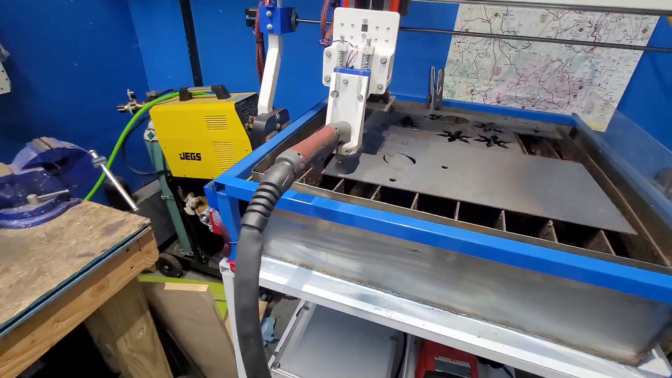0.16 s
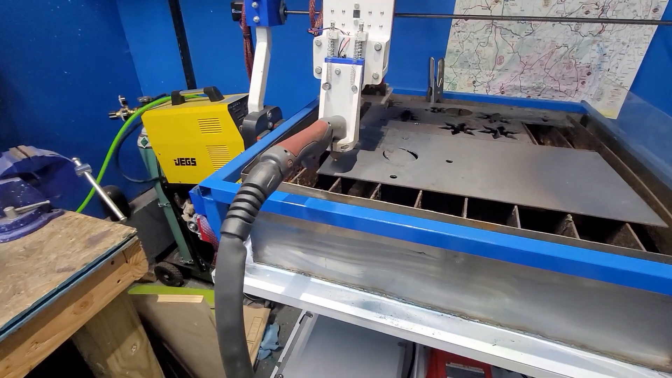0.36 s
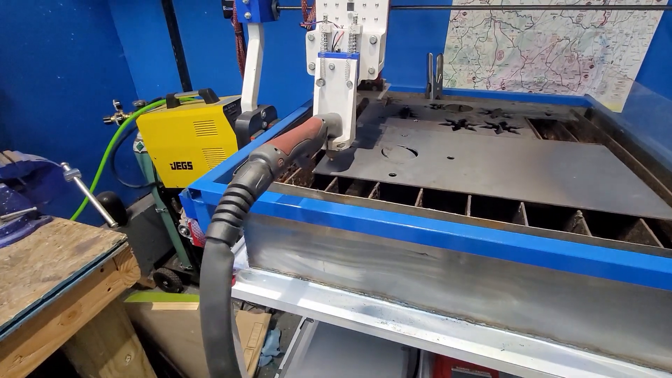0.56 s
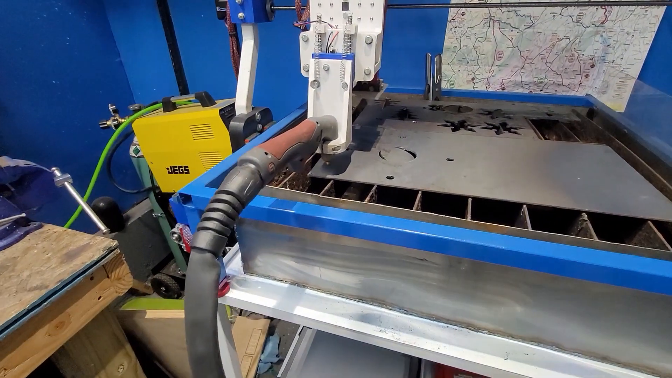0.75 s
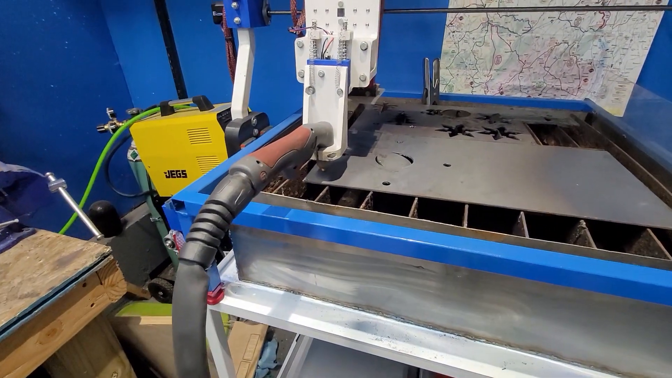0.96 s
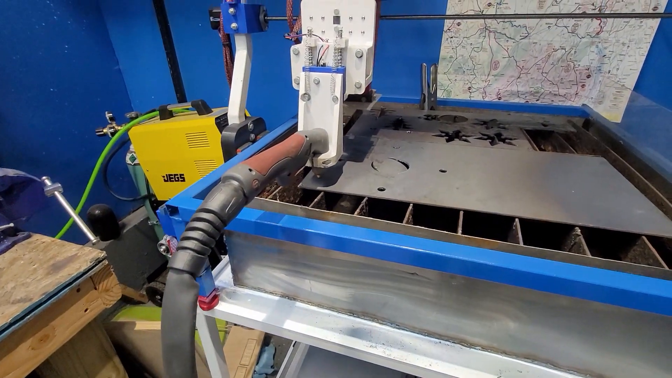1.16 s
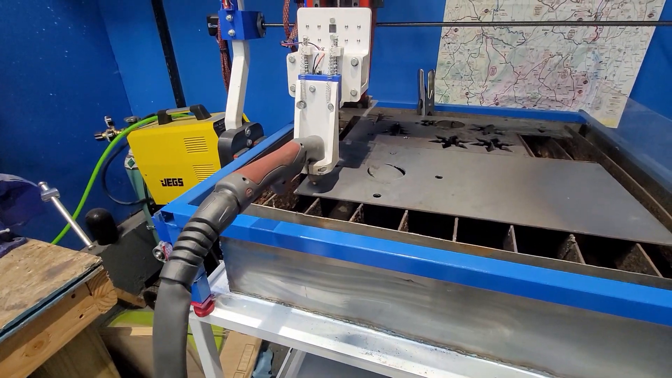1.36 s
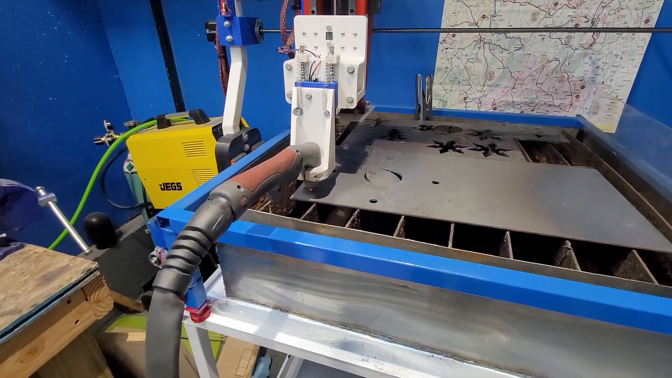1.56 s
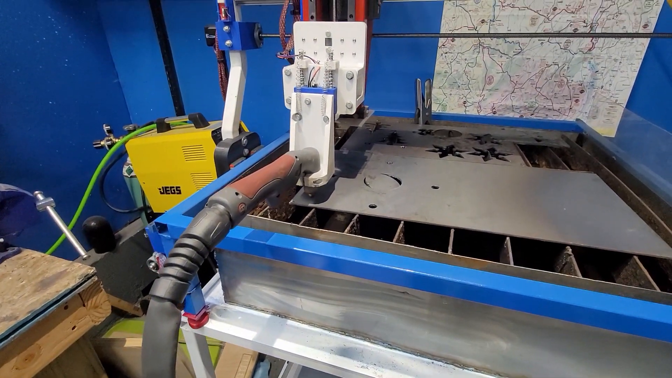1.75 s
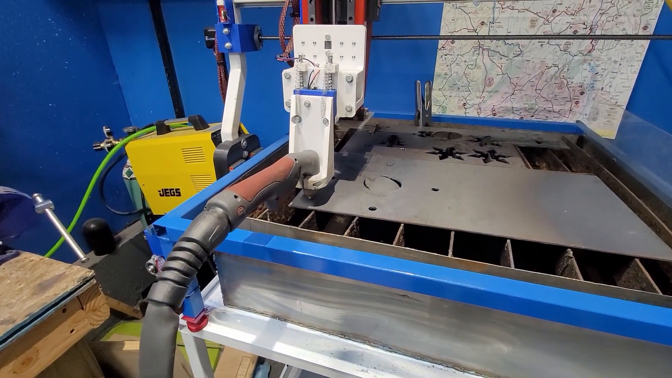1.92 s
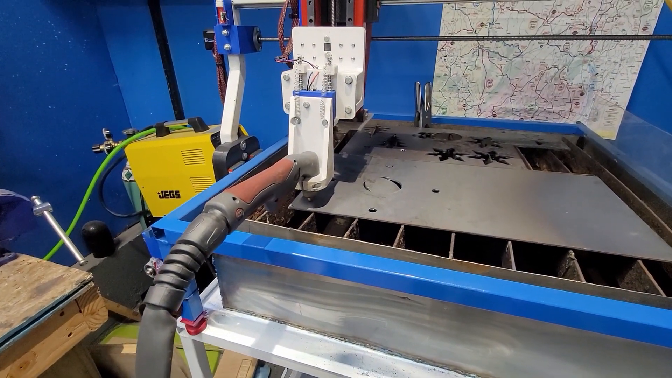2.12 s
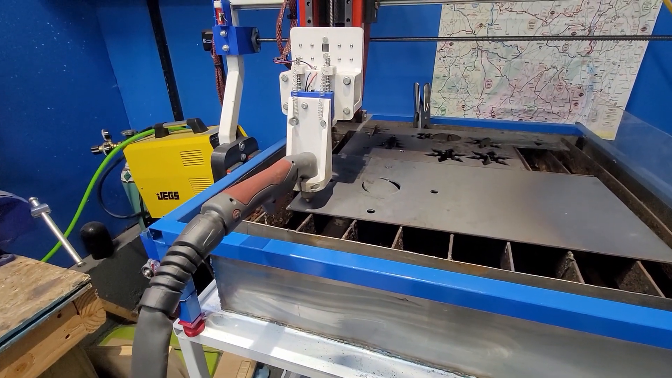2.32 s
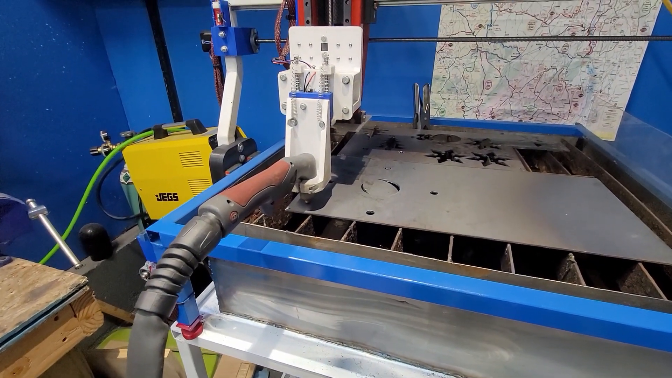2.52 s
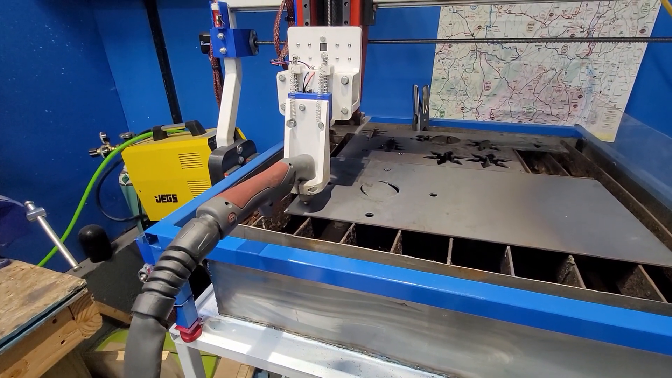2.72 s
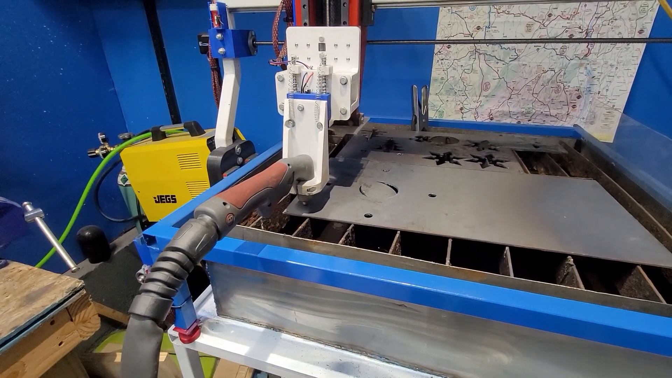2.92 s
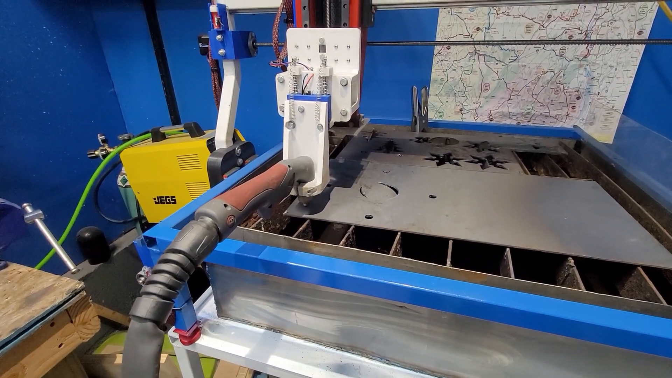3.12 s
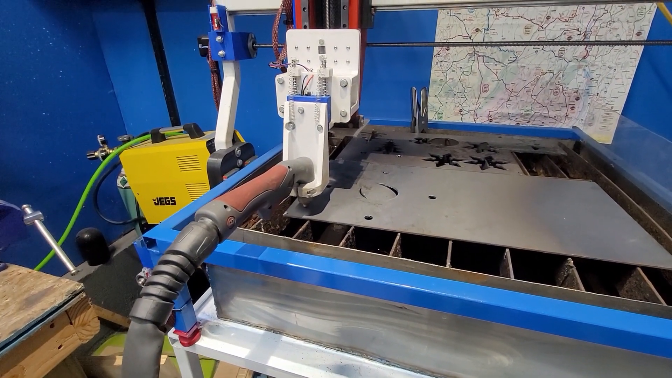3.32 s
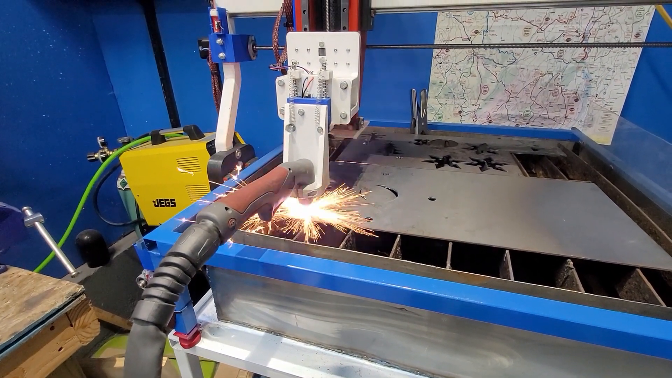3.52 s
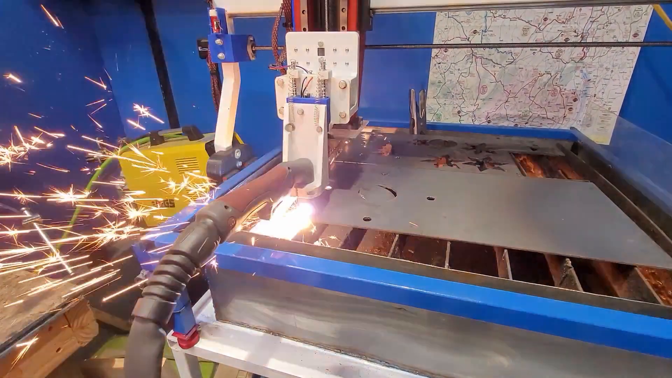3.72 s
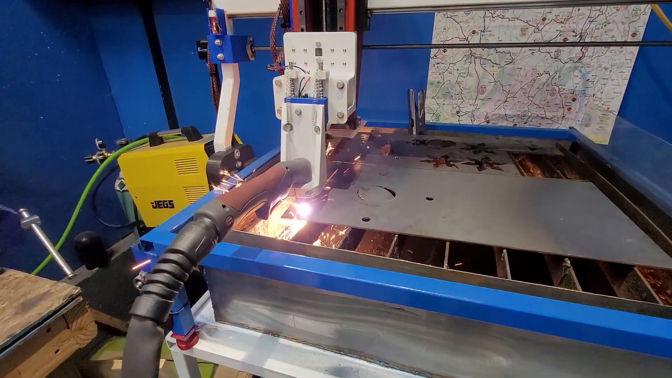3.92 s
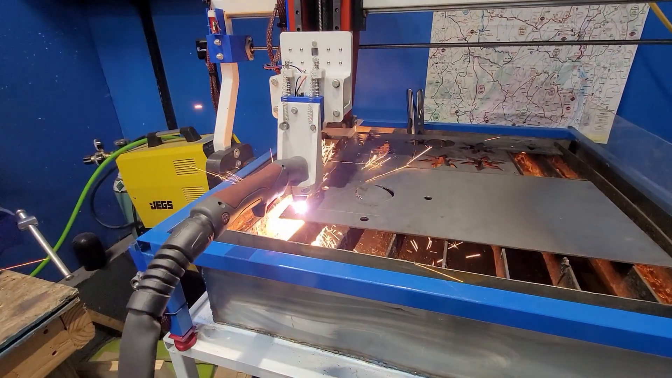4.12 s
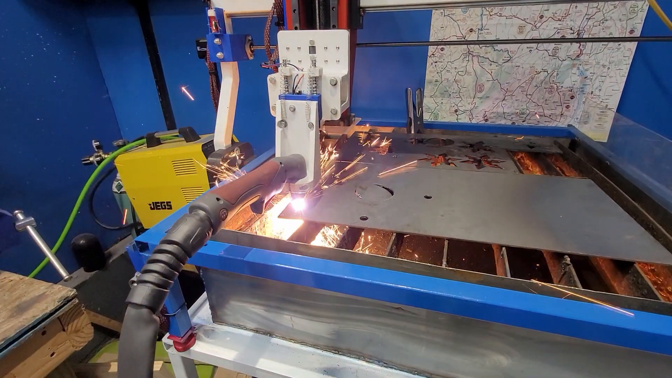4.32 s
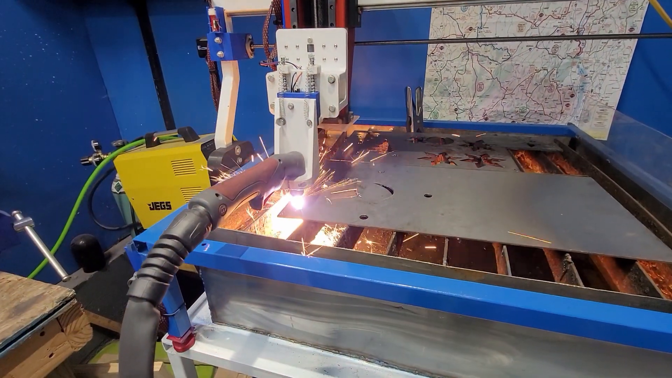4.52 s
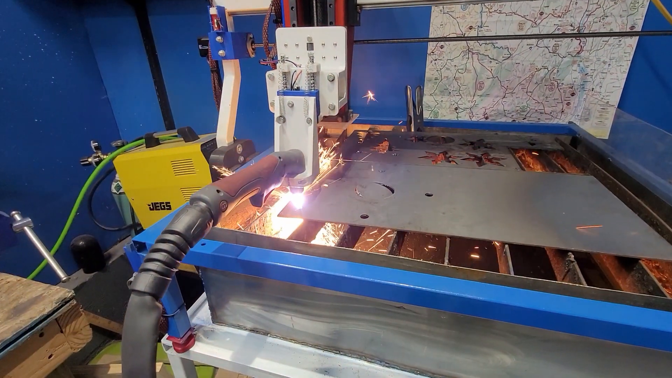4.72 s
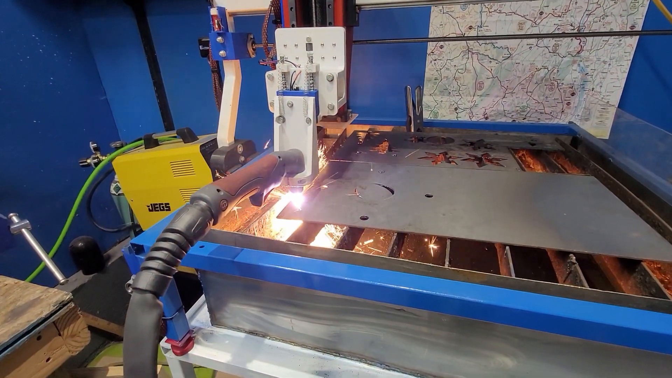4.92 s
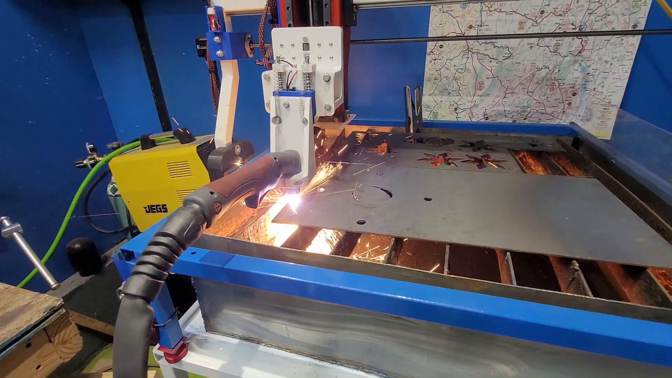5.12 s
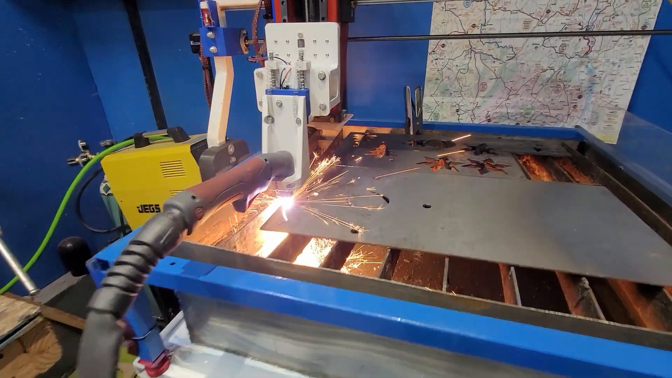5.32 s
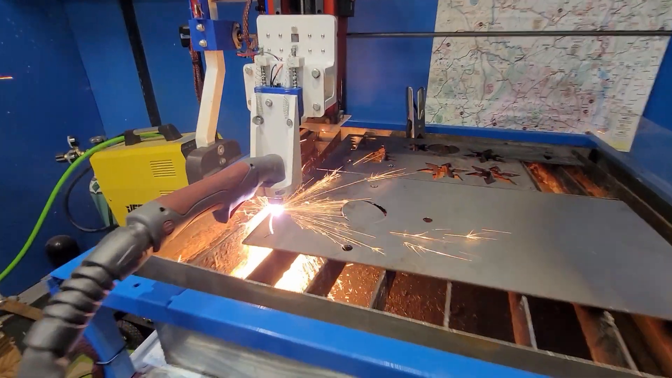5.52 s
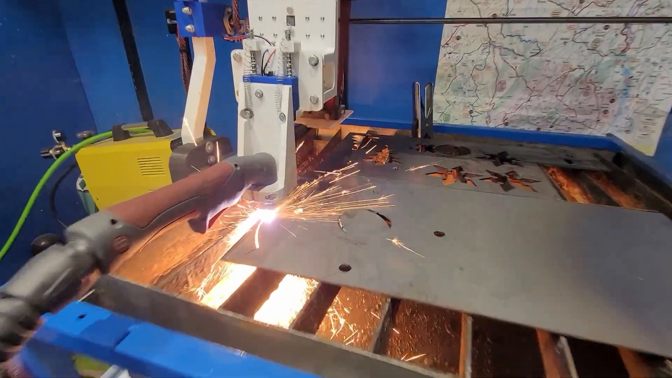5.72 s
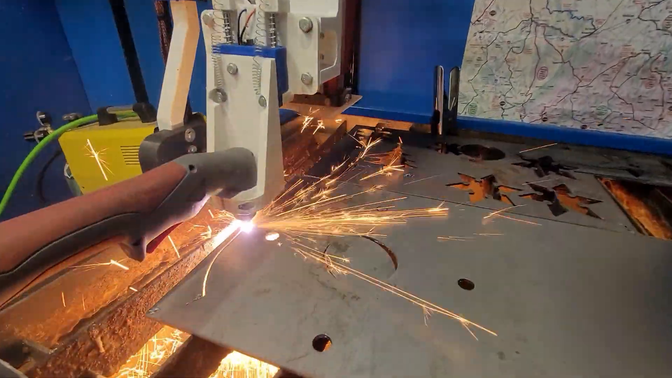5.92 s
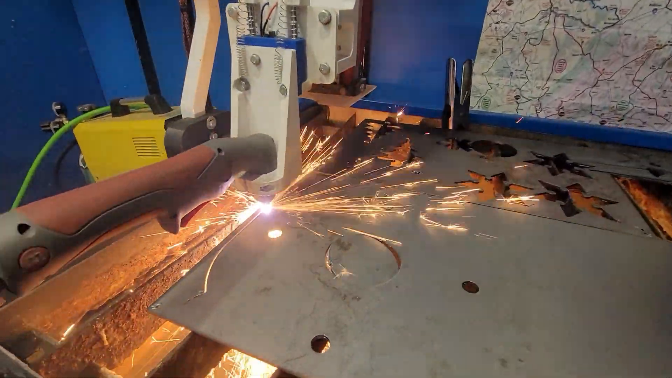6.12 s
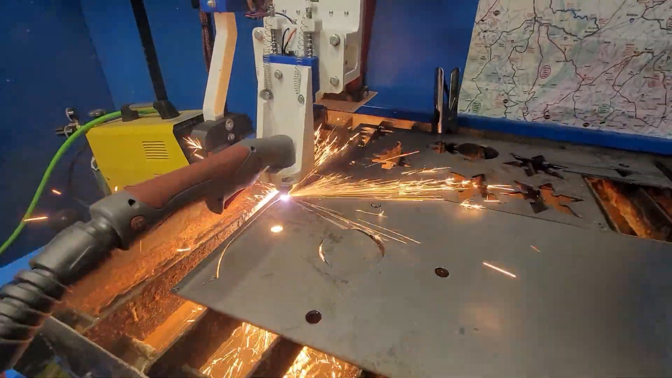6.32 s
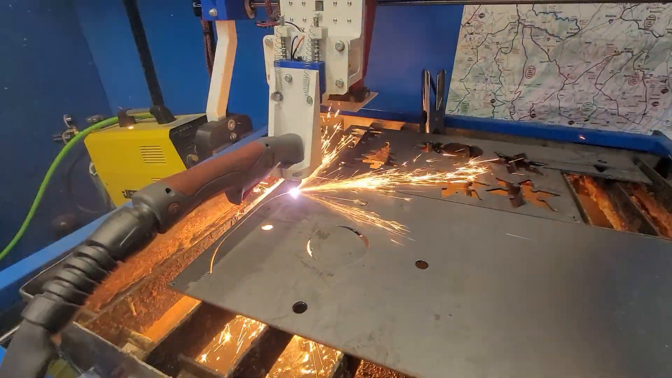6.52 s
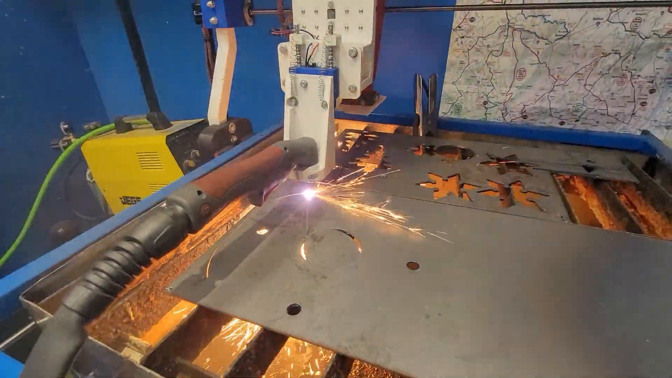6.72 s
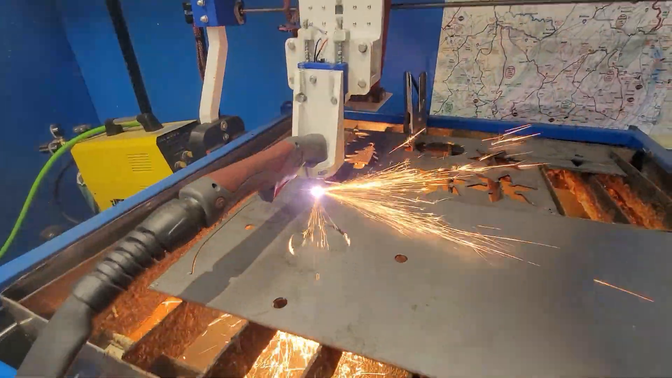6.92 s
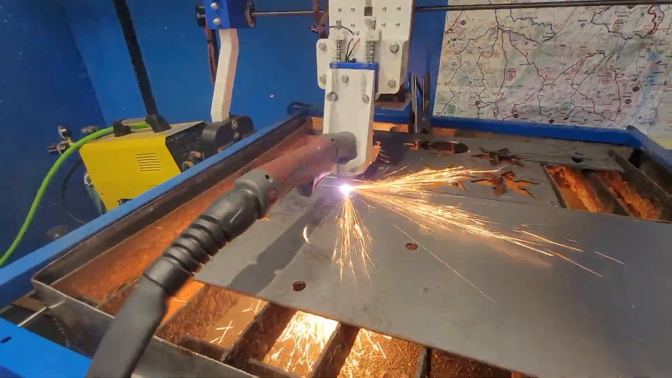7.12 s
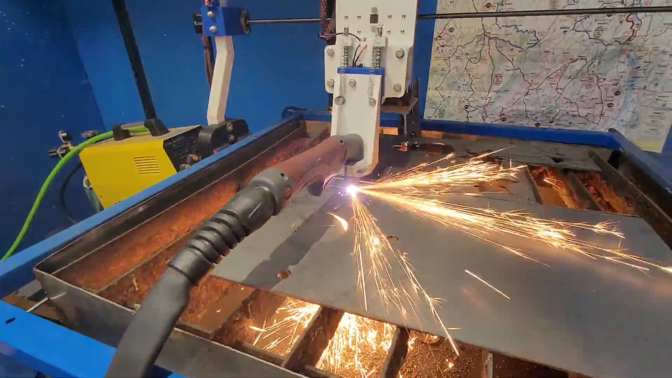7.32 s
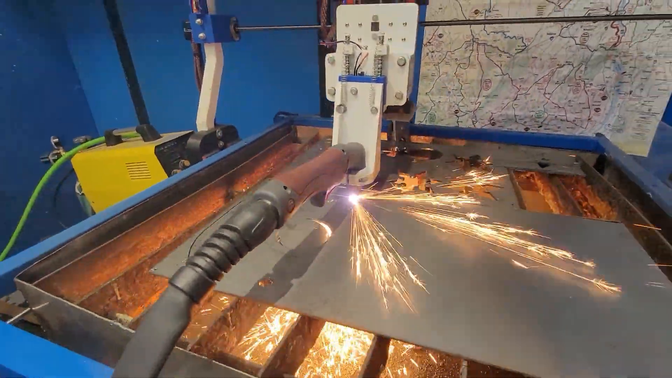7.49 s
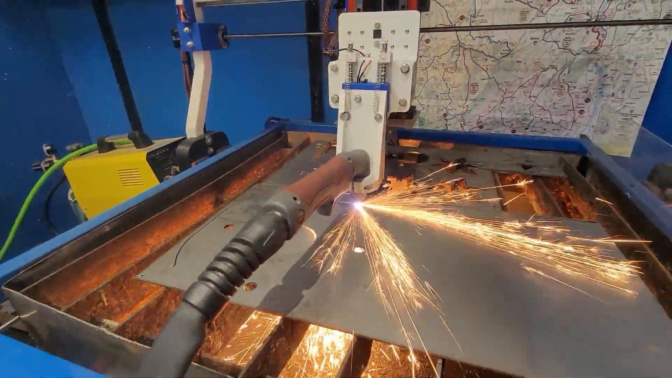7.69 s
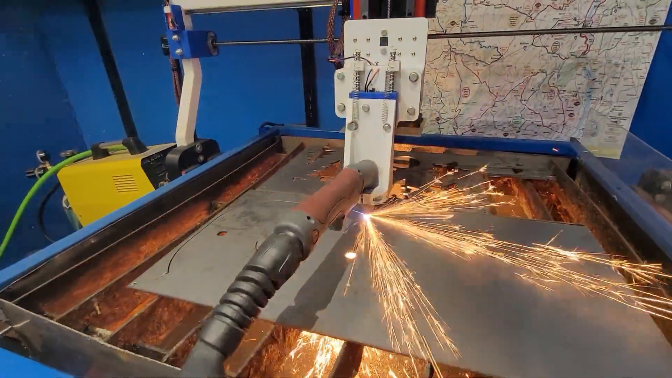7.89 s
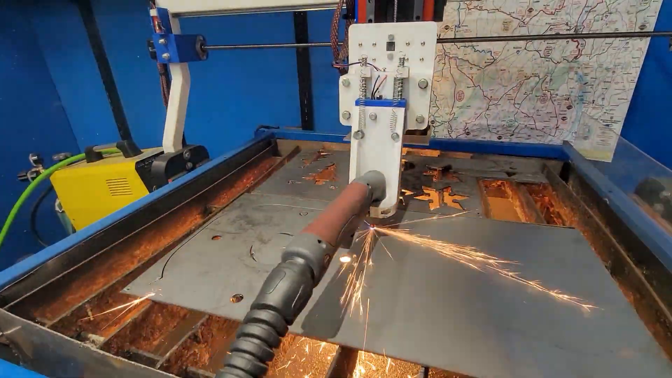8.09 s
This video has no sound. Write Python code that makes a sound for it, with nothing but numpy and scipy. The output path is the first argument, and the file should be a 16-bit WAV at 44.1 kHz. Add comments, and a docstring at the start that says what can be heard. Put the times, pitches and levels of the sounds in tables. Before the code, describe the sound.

In a small, fairly dry workshop, a fan hums low while feet shuffle, a hand bumps the microphone and thin squeaks chirp. After three and a half seconds a springy metallic valve thump opens the air, a bright blast pierces steel plate, and a close cutting torch hisses and roars to the end, its ringing colour shifting as the hand-held stereo microphone moves.

```python
"""A fan hums in a small workshop while something scuffs and ticks and a few squeaks sound: shaped noise, bursts
and gliding sines. At 3.45 s the air valve of a plasma torch on a cutting table thumps: a springy blow rings its
housing. The arc pierces the plate with a bright blast, then the jet hisses and roars through the kerf: banded
noise through moving resonances, dipping at three support slats. Gusts from the cut strike the left port of a
hand-held microphone."""
import sys
import numpy as np
from scipy import signal
from scipy.fft import rfft, irfft, next_fast_len
from scipy.io import wavfile

SR = 44100
rng = np.random.default_rng(int(sys.argv[2]) if len(sys.argv) > 2 else 0)


def output_pcm(signal):
    """Save a mono or channel-first signal as 16-bit PCM at the path in sys.argv[1].

    Samples are clipped to [-1, 1] before scaling.
    """
    pcm = np.clip(np.atleast_2d(signal).T, -1, 1) * 32767
    wavfile.write(sys.argv[1], SR, np.round(pcm).astype(np.int16))


N = 359415

AIR_ON_S, VALVE_S = 3.452, 3.4572
PORT_LAG_S = 0.00012   # the direct sound reaches the right port later
ROOM_T60_S, ROOM_DB = 0.13, 5.5   # decay of the room's tail, and its level over the direct sound
# left-right likeness of the torch's noise before the room: frequency_hz, likeness (0 to 1)
TORCH_LIKENESS = [(60, 0.64), (240, 0.43), (950, 0.63), (3800, 0.69), (15000, 0.21)]


def torch():
    """The air opens, the arc pierces and cuts: hiss, roar and low sound share a ring that shifts and swells."""
    # course of the torch, jet and roar ahead of a 3 dB lift: time_s, jet_db, plate_over_jet_db, roar_db
    torch_course = [(3.452, -21, -26, -29), (3.457, -22, -18, -36), (3.463, -30, -15, -42),
                    (3.476, -29, -14, -45), (3.499, -23, -16, -42), (3.505, -13.5, -15.5, -25.5),
                    (3.57, -13.5, -14.5, -31), (3.63, -13.5, -25.5, -31.5), (3.67, -15.5, -16, -33.5),
                    (3.722, -16, -22, -31.5), (3.74, -23, -16, -34), (3.8, -25.5, -15, -37),
                    (3.925, -21.5, -15.5, -33), (4.02, -27.5, -9.5, -36), (4.12, -26, -12, -34),
                    (4.72, -18.5, -16, -29), (5.15, -19, -13, -28.5), (5.55, -18, -13.5, -28),
                    (5.75, -19, -9, -28.5), (5.81, -22, -9.5, -32), (6.2, -22.5, -10, -30.5),
                    (6.55, -22.5, -10.5, -30.5), (6.76, -21.5, -9.5, -27), (6.98, -22.5, -11.5, -28.5),
                    (7.12, -22.5, -9, -28), (7.4, -21.5, -8, -29), (7.6, -23, -6, -27.5),
                    (7.74, -22, -9.5, -26), (7.96, -23.5, -6, -28), (8.15, -23, -10.5, -28.5)]
    # support slats under the plate: time_s, half_width_s, roar_dip_db
    slat_crossings = [(6.817, 0.027, -8.5), (7.283, 0.024, -9), (7.774, 0.021, -9.5)]
    # left minus right level as the microphone moves: time_s, treble_pan_db, roar_pan_db
    side_course = [(3.44, 2, -2), (3.91, 2.5, -0.5), (4.87, 3, 0), (6.08, 3.5, -3), (6.68, 4, -3),
                   (7.72, 1.5, -2), (8.15, 3, -1.5)]
    # shifting ring in the sound of the cut: time_s, centre_hz, gain_db
    gap_course = [(3.45, 3120, -9), (4.1, 3100, -4), (4.8, 2860, -8), (5.5, 3580, -9.5), (5.7, 3800, -5),
                  (5.95, 3240, -5.5), (6.2, 3370, -6), (6.3, 3050, -2), (6.45, 3330, 0), (6.56, 3400, -1),
                  (6.7, 3730, -6), (7.0, 3160, -18), (7.15, 2930, -6), (7.25, 3630, -5), (7.52, 3350, -20),
                  (7.65, 3030, -6), (7.8, 3950, -0.5), (7.92, 3670, -1.5), (8.15, 3200, -10)]
    slat_jet_share = 0.17   # share of the roar's dip that the jet takes
    turn_s, turn_length_s = 5.72, 0.19   # the torch turns from the plate's edge inward
    gap_width_hz, opening_s = 800, 0.0015

    jet_db, plate_db, roar_db = in_time(torch_course)
    for s, half_width, dip_db in slat_crossings:   # the slat chokes the outflow for a moment
        choke_db = dip_db * np.exp(-((seconds() - s) / half_width) ** 4)
        jet_db = jet_db + slat_jet_share * choke_db
        roar_db = roar_db + choke_db
    turned = np.clip((seconds() - turn_s) / turn_length_s, 0, 1)
    age = np.maximum(seconds() - AIR_ON_S, 0)
    start = round(AIR_ON_S * SR)
    spaces = [room(next_fast_len(N - start)).astype(np.complex64) for place in range(5)]
    sputter = drift(40)   # molten metal leaves the kerf in spurts

    treble_pan_db, roar_pan_db = in_time(side_course)
    hiss = jet_hiss(jet_db, plate_db, treble_pan_db, sputter, spaces, start)
    roar = kerf_roar(roar_db, turned, age, sputter, spaces, start)
    low = under_table(roar_db, turned, age, start)
    cut = hiss + panned(roar + low, roar_pan_db)
    gap_hz, gap_db = in_time(gap_course)
    ringing = from_db(gap_db) * moving_resonance(cut, gap_hz, gap_width_hz)
    return np.clip(age / opening_s, 0, 1) * (cut + ringing)


def jet_hiss(jet_db, plate_db, treble_pan_db, sputter, spaces, start):
    """Nozzle turbulence: the jet above 4200 Hz and, below it, the duller hiss off the plate."""
    # nozzle spectrum: frequency_hz, relative_level_db_per_hz
    nozzle_spectrum = [(1290, -28), (2200, -12.5), (2430, -11), (3490, -7.5), (4550, -5.5), (6220, -0.5),
                       (7580, -1), (8580, 1.5), (10600, -1), (12600, 2), (14300, -4.5), (15200, -5),
                       (15800, -3)]
    top_pan_db = -3.5   # the top sits to the right
    blast_top_db, blast_ends_s, blast_fade_s = 7, 3.66, 0.08   # brighter top until the arc breaks through

    noise = air(nozzle_spectrum, [], TORCH_LIKENESS, shared_db=0.0, own_db=1.0, rate=22, space=spaces, start=start)
    plate, jet = split(noise, 4200)
    jet, top = split(rms_one(jet), 10500)
    blast_db = blast_top_db * np.clip((blast_ends_s - seconds()) / blast_fade_s + 1, 0, 1)
    bright = panned(jet + from_db(plate_db) * rms_one(plate), treble_pan_db)
    bright += panned(top * from_db(blast_db), np.full(N, top_pan_db))
    return np.sqrt(2) * from_db(jet_db + 0.29 * sputter) * bright


def kerf_roar(roar_db, turned, age, sputter, spaces, start):
    """Sputtering outflow in the kerf: noise that changes colour at the turn, with rings growing as the cut deepens."""
    # roar along the plate's edge: frequency_hz, relative_level_db_per_hz
    edge_spectrum = [(290, -29), (500, -8.5), (578, -9.5), (828, -8.5), (977, -3.5), (1220, -5.5),
                     (1440, -0.5), (1570, -6.5), (1720, -5.5), (2800, -8), (3640, -22), (6160, -120)]
    # roar after the turn inward: frequency_hz, relative_level_db_per_hz
    inner_spectrum = [(290, -58), (500, -26), (621, 1.5), (754, -2), (943, 3), (1050, -7), (1150, 1.5),
                      (1640, -0.5), (2140, -2.5), (2800, -10), (3640, -3.5), (6160, -120)]
    # plate resonances: centre_hz, width_hz, gain_db
    plate_modes = [(920, 120, 1.5), (1156, 7.8, 6), (1440, 84, -3), (1755, 77, -0.5)]
    # resonance of the gap under the nozzle, swelling as a slat comes near: time_s, centre_hz, gain_db
    throat_course = [(4.0, 1430, 8.5), (4.4, 1410, 4), (4.85, 1560, 1.5), (5.3, 1570, 2), (5.7, 1840, 4.5),
                     (6.0, 1570, 2.5), (6.3, 1630, 1.5), (6.5, 1520, 8.5), (6.77, 1620, 5.5),
                     (6.95, 1280, 2.5), (7.2, 1390, 3.5), (7.35, 1480, 6), (7.5, 1570, 6.5),
                     (7.74, 1530, 1.5), (7.85, 1550, 0.5), (8.02, 1770, 5), (8.15, 1600, -4)]
    # narrow rings that wander in the roar: centre_hz, gain_db
    strand_rings = [(1150, -4), (1900, -8)]
    # ridges gliding as the pocket between plate and slats changes: time_s, low_hz, low_db, high_hz, high_db
    ridge_course = [(4.0, 1380, -10, 1700, -18), (4.6, 1410, -9, 1750, 2), (5.1, 1470, 0, 1670, -7),
                    (5.7, 1420, -4, 1820, -16), (5.9, 1406, 1, 1830, -3), (6.35, 1350, -1, 1900, -4),
                    (6.48, 1470, 2, 1970, -7), (6.64, 1510, 4, 2000, -3), (6.78, 1600, -1, 1810, 2),
                    (6.9, 1400, -3, 1640, -10), (7.1, 1330, -3, 1690, 1), (7.27, 1400, -14, 1720, -3),
                    (7.45, 1480, 4, 1660, -4), (7.6, 1420, -5, 1640, 1), (7.74, 1410, 10, 1920, 0),
                    (7.85, 1430, -10, 1570, 2), (8.03, 1500, -4, 1740, 6), (8.15, 1550, 1, 1780, 1)]
    throat_width_hz, strand_width_hz, ridge_width_hz = 690, 44, 67
    strand_wander = 0.039   # share of the pitch, reached after the turn
    edge_wander_share = 0.45   # the wander is smaller along the edge
    ridge_flutter_db = 2.5
    deep_s = 1.35   # the rings grow until the kerf is cut this long

    edge, inner = [air(colour, plate_modes, TORCH_LIKENESS, shared_db=0.0, own_db=1.5, rate=12.5,
                       space=spaces, start=start) for colour in (edge_spectrum, inner_spectrum)]
    kerf = np.sqrt(1 - turned) * edge + np.sqrt(turned) * inner
    deep = np.clip(age / deep_s, 0, 1)

    throat_hz, throat_db = in_time(throat_course)
    throat_gain = from_db(throat_db + (0.6 + 0.34 * turned) * sputter)
    kerf = kerf + deep * throat_gain * moving_resonance(kerf, throat_hz, throat_width_hz)

    wander = strand_wander * (edge_wander_share + (1 - edge_wander_share) * turned)
    strands = 0
    for hz, db in strand_rings:
        strand_hz = hz * (1 + wander * drift(3.3))
        strands = strands + from_db(db + 0.76 * drift(4.3)) * moving_resonance(kerf, strand_hz, strand_width_hz)
    kerf = kerf + deep * strands

    low_hz, low_db, high_hz, high_db = in_time(ridge_course)
    ridges = 0
    for hz, db in ((low_hz, low_db), (high_hz, high_db)):
        flutter_db = ridge_flutter_db * drift(25)
        ridges = ridges + from_db(db + flutter_db) * moving_resonance(kerf, hz, ridge_width_hz)
    kerf = kerf + deep * ridges
    return np.sqrt(2) * from_db(roar_db + (0.4 + 0.45 * turned) * sputter) * rms_one(kerf)


def under_table(roar_db, turned, age, start):
    """Rumble and drone under the table follow the roar; the first rush of air booms and the table drive hums."""
    # spectrum under the table: frequency_hz, relative_level_db_per_hz
    rumble_spectrum = [(12, -49), (20, -84), (75, -9.5), (197, -4), (253, -3.5), (307, -1), (349, 1.5),
                       (406, 0), (560, -3.5), (730, -26), (1230, -120)]
    # table drive along the first edge: pitch_hz, level_db, start_s, end_s
    drive_hum = (157, -52.5, 4.5, 5.75)
    boom_db, boom_rise_s, boom_t60_s = -29, 0.03, 0.3

    over_db = roar_db + 30   # roar above a reference of -30 dB
    rumble_db = -46.5 + 0.97 * over_db - 0.14 * turned
    drone_db = -47 + 2 * over_db - 10 * turned
    boom_fall_db = 60 * np.maximum(age - boom_rise_s, 0) / boom_t60_s
    boom = np.clip(age / boom_rise_s, 0, 1) ** 2 * from_db(boom_db - boom_fall_db)
    noise = air(rumble_spectrum, [], TORCH_LIKENESS, shared_db=1.1, own_db=4.0, rate=8.6, start=start)
    rumble, drone = split(noise, 274)
    low = from_db(rumble_db) * rms_one(rumble) + (from_db(drone_db) + boom) * rms_one(drone)
    return low + tone(*drive_hum, waver=0.83, rate=3.8)


def valve():
    """The plunger lands with a springy blow of a few cycles that sets the modes of the housing ringing."""
    # modes of the valve housing: pitch_hz, gain_db, t60_s
    housing_modes = [(291, 3, .2), (321, 3, .17), (420, -5.5, 0.23), (480, -1, 0.15), (654, -1, 0.18),
                     (830, 7, 0.045), (900, 15, .05), (190, -2, .12), (110, -1, 0.16), (993, 1, .12),
                     (1240, 5, .12), (1470, -1, 0.088)]
    blow_db, rattle_db, rattle_t60_s = -20, -22, 0.32

    out, blow, at = np.zeros((2, N)), np.zeros(SR // 2), round(VALVE_S * SR)
    blow[0] = from_db(blow_db)
    springy = 0.027 * ring(blow, 361, 0.063)
    springy += 0.11 * np.roll(blow, round(0.00187 * SR))   # metal meets metal
    springy += 0.11 * np.roll(blow, round(0.019 * SR))   # and rebounds
    boom = split(sum(from_db(db) * ring(springy, hz, t60) for hz, db, t60 in housing_modes), 103)[1]
    echoed = irfft(rfft(boom) * room(len(blow)), len(blow))
    # loose parts rattle and the floor thuds
    dying = from_db(rattle_db - 60 * np.arange(len(blow)) / SR / rattle_t60_s)
    rattle = band_noise(60, 1100, len(blow))
    out[:, at:at + len(blow)] = dying * rms_one(rattle) + boom + 0.25 * echoed
    return out


def gusts():
    """Sudden pressure steps, rounded, which the microphone's bass cut turns into a spike and a swing."""
    # gusts on the left port: time_s, step_db, direction (push +1, pull -1)
    gust_steps = [(3.513, -15, 1), (3.5453, -10, 1), (3.5706, -14, 1), (3.958, -24, -1), (4.02, -27, -1),
                  (5.159, -5, -1)]
    edge_hz, bass_cut_hz = 1900, 41

    steps = 1e-9 * rng.standard_normal(N)
    for s, db, sign in gust_steps:
        steps[round(s * SR):] += from_db(db) * np.sign(sign)
    rounded = split(steps, edge_hz)[0]
    left = signal.sosfilt(signal.butter(4, bass_cut_hz, "high", fs=SR, output="sos"), rounded)
    return left * from_db([[0], [-30]])   # the right port hardly feels them


def bumps():
    """A hand on the microphone's case: brief low sines in a bell-shaped swell, weaker on the right."""
    # bumps: centre_s, level_db, pitch_hz
    case_bumps = [(0.316, -45, 144), (0.26, -40, 48), (0.34, -39, 51), (0.17, -40, 90)]
    out = np.zeros((2, N))
    for s, db, hz in case_bumps:
        age = seconds() - s
        swell = from_db(db) * np.exp(-(age * hz / 1.1) ** 2)
        out += swell * np.sin(2 * np.pi * hz * age) * [[1], [0.6]]
    return out


def scuffs_and_ticks():
    """Scuffs, rustles, ticks and a short high whine: bursts of band noise that rise quickly and die away."""
    # bursts, level ahead of rise and decay: start_s, level_db, rise_s, t60_s, low_hz, high_hz
    noise_bursts = [(0.005, -42, 0.037, 0.87, 89.64, 310), (.12, -41.5, .03, 0.96, 60, 240),
                    (0.1, -17.5, 0.053, 0.2, 529.2, 3300), (.112, -29, 0.011, 0.18, 1150, 1590),
                    (.17, -43, 0.018, 1, 800, 3300), (0.29, -38, 0.012, 0.11, 972, 4167),
                    (2.234, -41, 0.0021, 0.24, 1296, 2100), (2.291, -40.5, .005, 0.13, 1600, 3300),
                    (2.93, -45, .01, 0.17, 5000, 15000), (1.3705, -44, .001, 0.03, 3800, 4500),
                    (2.94, -55, .03, .3, 13700, 14600)]
    out, age = np.zeros((2, N)), np.arange(SR // 3) / SR
    for s, db, rise, t60, low_hz, high_hz in noise_bursts:
        at = round(s * SR)
        envelope = from_db(db - 60 * age / t60) * np.clip(age / rise, 0, 1)
        out[:, at:at + len(age)] += envelope * rms_one(band_noise(low_hz, high_hz, len(age)))
    return out


def squeaks():
    """Short sines gliding in pitch, their level roughened separately at each port."""
    # squeaks, peak level ahead of the roughness: start_s, length_s, start_hz, end_hz, level_db
    squeak_glides = [(.025, .05, 4200, 4100, -50), (.075, .06, 3350, 2980, -43),
                     (.29, .018, 4150, 4150, -48), (2.262, .025, 4200, 4180, -52),
                     (2.345, .03, 2520, 2560, -53), (2.43, .065, 3900, 3880, -58),
                     (2.49, .02, 4600, 4550, -56), (2.517, .022, 2580, 2580, -46),
                     (2.54, .03, 2560, 2520, -50), (2.555, .035, 3000, 2950, -47),
                     (2.612, .026, 2600, 2560, -44), (2.64, .022, 2500, 2420, -50),
                     (2.685, .035, 3900, 3900, -57), (2.708, .014, 2800, 2800, -49),
                     (2.735, .025, 3200, 3050, -51)]
    out = np.zeros((2, N))
    rough = 0.75 + 0.6 * np.array([drift(100), drift(100)])   # uneven slip blurs each squeak
    for s, length, start_hz, end_hz, db in squeak_glides:
        at, part = round(s * SR), np.linspace(0, 1, round(length * SR))
        hz = end_hz + (start_hz - end_hz) * (1 - part) ** 4
        swell = from_db(db) * np.sqrt(np.abs(np.sin(np.pi * part)))
        glide = np.sin(2 * np.pi * np.cumsum(hz) / SR)
        out[:, at:at + len(part)] += swell * rough[:, at:at + len(part)] * glide
    return out


def fan():
    """The power source: blade noise in the shop's resonances, wavering shaft orders, thin whines and an air leak."""
    # blade noise: frequency_hz, relative_level_db_per_hz
    blade_spectrum = [(12, -75), (20, -45), (59, -34), (80, -26), (114, -27), (163, -19), (221, -19.5),
                      (258, -12), (408, -1), (615, -6.5), (698, -17), (774, -9), (879, -16.5),
                      (1890, -20.5), (9000, -39.5), (11700, -65), (19800, -120)]
    # air leak: frequency_hz, relative_level_db_per_hz
    leak_spectrum = [(4120, -41), (7000, -13), (10700, -6.5), (11300, -8.5), (12300, -5), (12800, -8),
                     (13300, -1.5), (15700, -17)]
    # shop resonances and nulls that colour the fan: centre_hz, width_hz, gain_db
    shop_modes = [(265, 6.2, 4.5), (313, 15, -2), (317.3, 5.5, 10.5), (349.8, 11, 8), (368.6, 13, 4.5),
                  (394, 10.4, -11.5), (408.6, 6.3, 5.5), (427, 20, 7.5), (450, 19.5, -15), (478, 12, 2),
                  (503, 5.9, 7), (524, 16, -13), (560, 9.1, -1), (750, 40, 0.5), (930, 25, -5),
                  (972, 46, 8.5), (1065, 17, 7.5), (1530, 50, 5.5), (1820, 70, 8.5), (2640, 80, -0.5)]
    # left-right likeness, below 0 taken as 0: frequency_hz, likeness
    fan_likeness = [(60, 0.41), (180, 0.96), (550, 0.59), (1650, -0.42), (4970, -0.15), (15000, -0.86)]
    # shaft orders, level ahead of a 3.5 dB lift: multiple_of_shaft, peak_level_db
    shaft_orders = [(1, -66), (7, -55.5), (16, -62.5), (24, -64.5)]
    # whines of the power source: pitch_hz, level_db, start_s, end_s
    whine_tones = [(618, -51.5, 0, 1.04), (11600, -80, .5, 1.8), (13264, -85, .4, 1.9),
                   (13800, -73, 2.2, 2.8), (14700, -76, .4, 1.6), (14150, -70, 2.5, 3.0)]
    shaft_hz, fan_pan_db = 87.86, 0.9   # pan is left minus right
    hum_db, sink_db, sink_s = -38, -15, 0.11   # the fan is heard this much weaker under the torch, dropping in this time
    leak_start_db, leak_fade_db_per_s = -61, 0.8   # the faint leak slowly dies down
    leak_ends_s, leak_end_db_per_s = 3.2, 15   # from here it falls by this much more

    t = seconds()
    sunk_db = sink_db * np.clip((t - VALVE_S) / sink_s, 0, 1)
    leak_db = leak_start_db - leak_fade_db_per_s * t - leak_end_db_per_s * np.maximum(t - leak_ends_s, 0)
    lines = sum(tone(*row, waver=2.5, rate=12) for row in whine_tones)
    for k, db in shaft_orders:
        height = from_db(db + 3.5 + 0.49 * drift(9.9))
        lines = lines + height * np.sin(2 * np.pi * k * shaft_hz * t + 0.28 * k * drift(1.52))
    hum = air(blade_spectrum, shop_modes, fan_likeness, shared_db=0.3, own_db=1.07, rate=6.4)
    leak = air(leak_spectrum, [], fan_likeness, shared_db=0.5, own_db=-1.0, rate=11)
    fan_sound = panned(from_db(hum_db) * hum + lines, np.full(N, fan_pan_db))
    return from_db(sunk_db) * fan_sound + from_db(leak_db) * leak


def air(spectrum, modes, likeness, shared_db, own_db, rate, space=None, start=0):
    """Stereo turbulence in overlapping half-octave bands that flicker together and each alone; mid rms 1."""
    size = next_fast_len(N - start)
    hz = np.maximum(np.arange(size // 2 + 1) * SR / size, 1)
    colour_db = at_hz(spectrum, hz) + sum(db / (1 + (2 * (hz - f) / w) ** 2) for f, w, db in modes)
    alike = np.clip(at_hz(likeness, hz), 0, 1)
    shared, *own = rng.standard_normal((3, size))
    if space is not None:
        shared = walked(shared, space)
    both = np.sqrt(alike) * rfft(shared) + np.sqrt(1 - alike) * rfft(np.array(own))
    both = both * from_db(colour_db)
    out, together = np.zeros((2, N)), drift(rate)
    lowest_hz, highest_hz = spectrum[1][0], spectrum[-2][0]
    last_band = round(2 * np.log2(highest_hz / lowest_hz))
    place = np.clip(2 * np.log2(hz / lowest_hz), 0, last_band)   # in half octaves
    for k in range(int(place[-1]) + 1):
        share = np.clip(1 - abs(place - k), 0, 1)
        band = irfft((both * share).astype(np.complex64), size)[:, :N - start]
        flicker_db = shared_db * together + own_db * drift(rate)
        out[:, start:] += band * from_db(flicker_db[start:])
    return out / np.sqrt(np.mean(out[:, start:].mean(axis=0) ** 2))


def room(size):
    """Response at each port: the direct sound, later on the right, and a tail of dying noise; mean power 1."""
    age = np.arange(SR // 3) / SR
    tail = rng.standard_normal((2, len(age))) * from_db(-60 * age / ROOM_T60_S) * (age > 0.003)
    tail *= from_db(ROOM_DB) / np.sqrt(np.sum(tail ** 2, axis=1, keepdims=True))
    hz = np.arange(size // 2 + 1) * SR / size
    direct = np.array([np.ones(len(hz)), np.exp(-2j * np.pi * hz * PORT_LAG_S)])
    return (direct + rfft(tail, size)) / np.sqrt(1 + from_db(2 * ROOM_DB))


def walked(x, spaces):
    """A sound heard while the microphone drifts from one room response to the next; power stays even."""
    place_s = 1.2   # time from one place to the next
    place = np.clip(np.arange(len(x)) / SR / place_s, 0, len(spaces) - 1)
    shares = [np.clip(1 - abs(place - k), 0, 1) for k in range(len(spaces))]
    whole = rfft(x)
    heard = sum(share * irfft(whole * space, len(x)) for share, space in zip(shares, spaces))
    tail = from_db(2 * ROOM_DB)   # power of the tail; tails of two places do not add in phase
    return heard * np.sqrt((1 + tail) / (1 + tail * sum(share ** 2 for share in shares)))


def moving_resonance(x, centre_hz, width_hz):
    """A resonance of gain 1 whose centre follows a curve, block by block, from the first rush of air."""
    out, state, r = np.zeros_like(x), np.zeros((2, 2)), np.exp(-np.pi * width_hz / SR)
    b = [(1 - r * r) / 2, 0, (r * r - 1) / 2]
    for i in range(round(AIR_ON_S * SR), N, 384):
        a = [1, -2 * r * np.cos(2 * np.pi * centre_hz[i] / SR), r * r]
        out[:, i:i + 384], state = signal.lfilter(b, a, x[:, i:i + 384], zi=state)
    return out


def tone(hz, db, start, end, waver, rate):
    """A sine that fades in and out and wavers in level and phase."""
    t = seconds()
    sounding = np.clip(np.minimum(t - start, end - t) / (0.038 * (end - start)), 0, 1)
    height = np.sqrt(2) * from_db(db + 3.0 * drift(rate))
    return sounding * height * np.sin(2 * np.pi * hz * t + waver * drift(rate))


def ring(x, hz, t60):
    """A resonator in which a unit click sets a sine of height 1 ringing."""
    r, w = from_db(-60 / (t60 * SR)), 2 * np.pi * hz / SR
    return signal.lfilter([0, np.sin(w)], [1, -2 * r * np.cos(w), r * r], x + 1e-18)


def band_noise(low_hz, high_hz, size):
    """Stereo noise with gentle slopes outside a band."""
    sos = signal.butter(1, [low_hz, high_hz], "band", fs=SR, output="sos")
    return signal.sosfilt(sos, rng.standard_normal((2, size)))


def drift(rate):
    """Slow chance of spread 1: noise at every 40th sample through a double one-pole low-pass at rate Hz."""
    r = np.exp(-80 * np.pi * rate / SR)
    slow = signal.lfilter([1], [1, -2 * r, r * r], rng.standard_normal(N // 40 + 2002))[2000:]
    return np.interp(np.arange(N) / 40, np.arange(len(slow)), rms_one(slow))


def split(x, hz):
    """Low and high part; each filter runs twice, so that the parts add up flat."""
    parts = [np.tile(signal.butter(2, hz, kind, fs=SR, output="sos"), (2, 1)) for kind in ("low", "high")]
    return [signal.sosfilt(sos, x) for sos in parts]


def panned(x, pan_db):
    """Tilts the two channels by a left-right level difference."""
    return x * from_db(np.array([pan_db / 2, -pan_db / 2]))


def at_hz(points, hz):
    """A spectrum read on a log-frequency axis."""
    point_hz, value = np.array(points).T
    return np.interp(np.log(hz), np.log(point_hz), value)


def in_time(rows):
    """Each column of a curve at every sample."""
    s, *columns = np.transpose(rows)
    return [np.interp(seconds(), s, c) for c in columns]


def seconds():
    """Time of every sample."""
    return np.arange(N) / SR


def rms_one(x):
    """Scaled to rms 1 over the part that sounds."""
    return x / np.sqrt(np.sum(x ** 2) / np.count_nonzero(x))


def from_db(db):
    """Gain of a level in dB."""
    return np.exp(np.asarray(db) * np.log(10) / 20)


def scene():
    """All sources at the two microphone ports."""
    return torch() + valve() + gusts() + bumps() + scuffs_and_ticks() + squeaks() + fan()


def record(dry):
    """Peaks are rounded, the top is cut steeply."""
    rounded = 1.15 * np.tanh(dry / 1.15)
    return signal.sosfilt(signal.ellip(12, 0.2, 90, 15740, fs=SR, output="sos"), rounded)


dry = scene()
out = record(dry)
output_pcm(out)
```